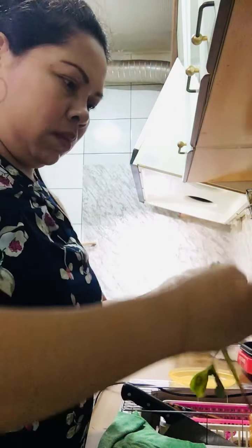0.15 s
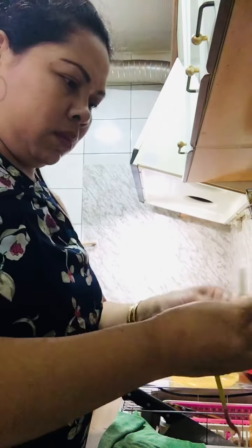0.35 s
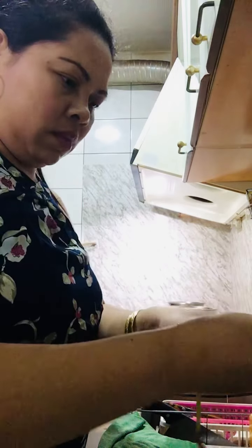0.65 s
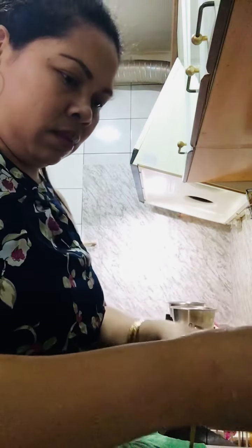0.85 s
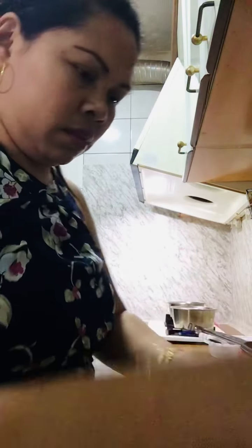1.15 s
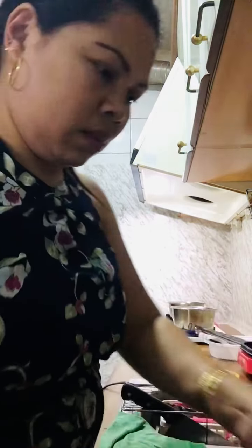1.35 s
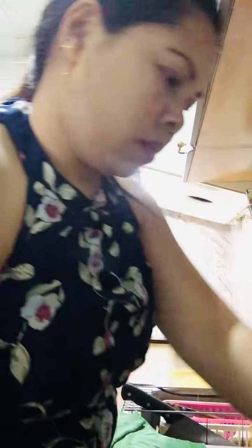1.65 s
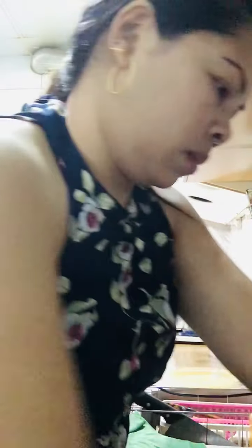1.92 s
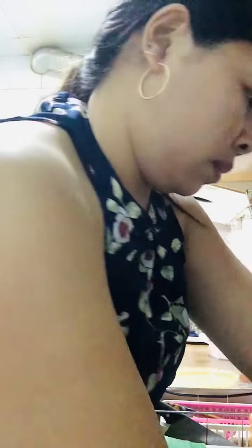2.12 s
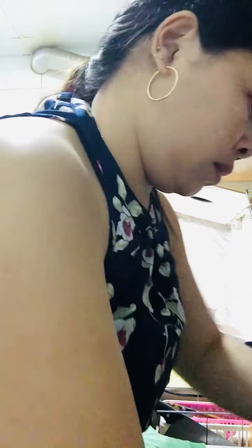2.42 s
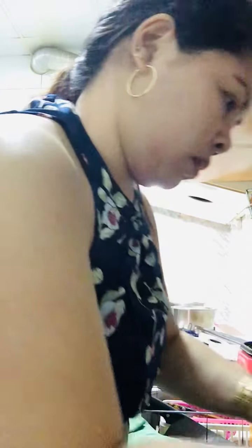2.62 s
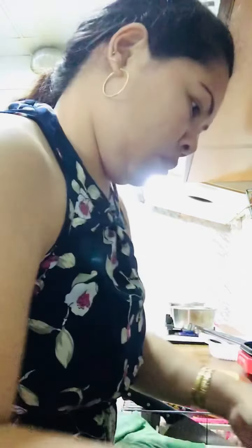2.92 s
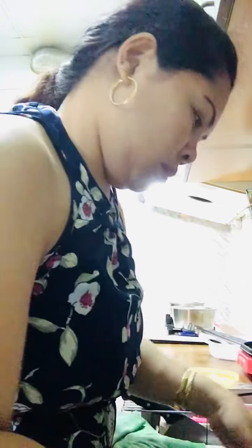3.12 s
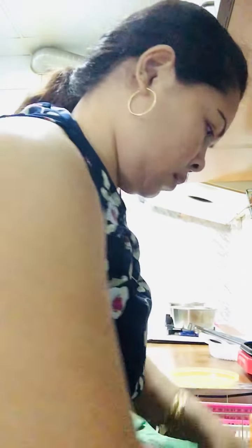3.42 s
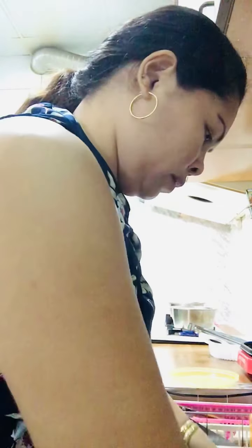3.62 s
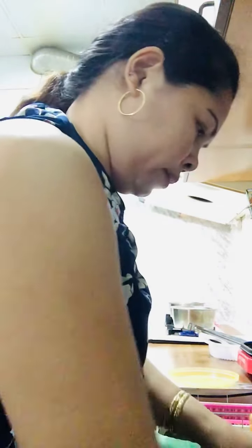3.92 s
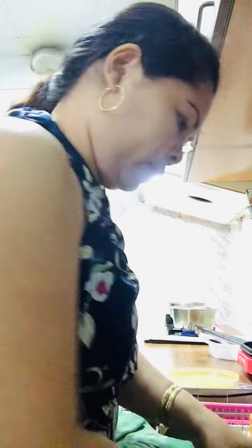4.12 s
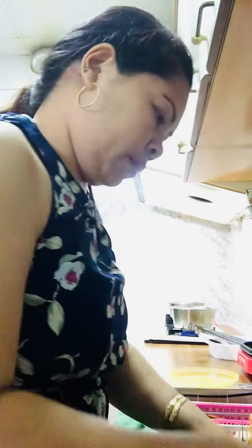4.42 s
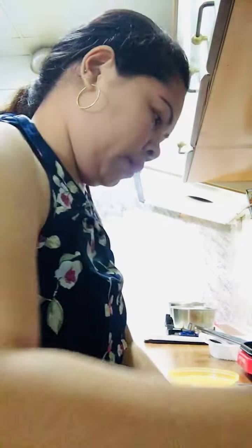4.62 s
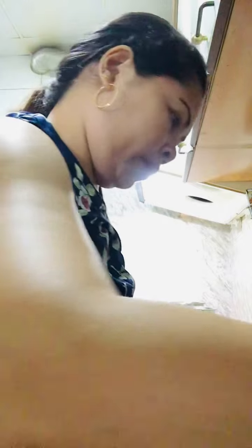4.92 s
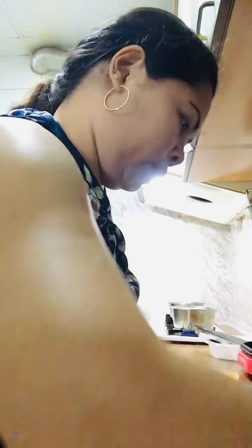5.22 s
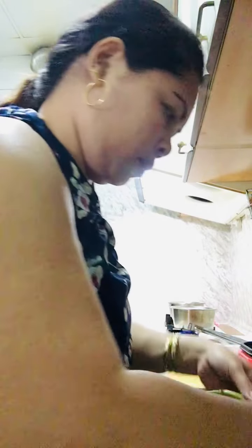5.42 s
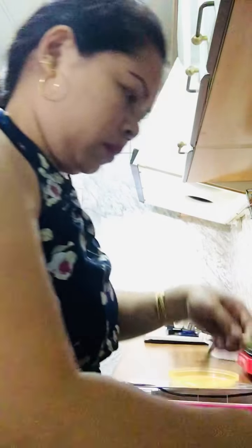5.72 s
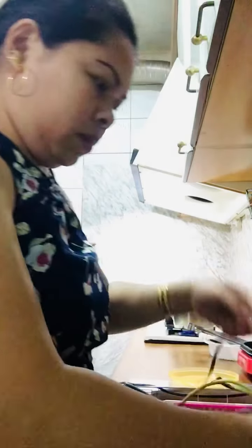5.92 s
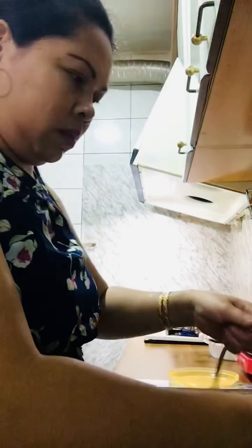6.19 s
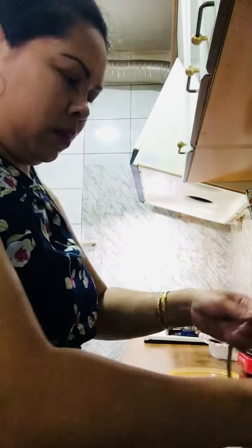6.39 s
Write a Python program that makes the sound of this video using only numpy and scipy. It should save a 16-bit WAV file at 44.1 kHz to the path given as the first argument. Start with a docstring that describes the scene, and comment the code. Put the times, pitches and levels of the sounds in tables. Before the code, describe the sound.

Leafy vegetable stems rustle and snap by hand in a small kitchen, with soft worktop thuds over a low appliance hum.

```python
"""An appliance hums under room noise and hiss in a small tiled kitchen, and leaves begin to rustle.
Leafy stems are handled and snapped over a worktop: each snap is a burst of tearing fibres with a knock
through the worktop. A stem squeaks through the fingers, soft bumps thud and a plastic tub is knocked.
The whole background drops abruptly part way through; the hum grows again near the end."""
import sys
import numpy as np
from scipy import signal
from scipy.fft import rfft, irfft, next_fast_len
from scipy.io import wavfile

SR = 44100
rng = np.random.default_rng(int(sys.argv[2]) if len(sys.argv) > 2 else 0)


def unload_audio(sound):
    """Save the sound as a 16-bit wav file, at the path given as the first command line argument."""
    columns = np.transpose(np.atleast_2d(sound))
    # keep every value between -1 and 1, then stretch to whole-number steps
    steps = np.round(np.clip(columns, -1, 1) * 32767)
    wavfile.write(sys.argv[1], SR, steps.astype(np.int16))


N = 288855


def from_db(db):
    """Decibels to gain."""
    return 10 ** (np.asarray(db) / 20)


def rms_one(x):
    """Scale to rms 1."""
    return x / np.sqrt(np.mean(x ** 2) + 1e-20)


def ramp(start_s, takes_s):
    """0 before the start, rising straight to 1."""
    return np.clip((np.arange(N) / SR - start_s) / takes_s, 0, 1)


def drift(rate_hz):
    """A slow random wander of rms 1."""
    step, settle = 40, 2000
    pole = np.exp(-2 * np.pi * rate_hz * step / SR)
    noise = rng.standard_normal(N // step + settle + 2)
    slow = signal.lfilter([1], [1, -2 * pole, pole * pole], noise)[settle:]
    return np.interp(np.arange(N) / step, np.arange(len(slow)), rms_one(slow))


def coloured(x, spectrum):
    """Shape a signal with an EQ curve; rms 1."""
    hz, level_db = np.transpose(spectrum)
    size = next_fast_len(N)
    grid_hz = np.maximum(np.arange(size // 2 + 1) * SR / size, 1)
    gain = from_db(np.interp(np.log(grid_hz), np.log(hz), level_db, left=-90, right=-90))
    return rms_one(irfft(rfft(x, size) * gain, size)[:N])


def resonance(x, hz, width_hz):
    """Two-pole peak of gain 1."""
    r = np.exp(-np.pi * width_hz / SR)
    feedback = [1, -2 * r * np.cos(2 * np.pi * hz / SR), r * r]
    return signal.lfilter([(1 - r * r) / 2, 0, (r * r - 1) / 2], feedback, x)


def band(x, low_hz, high_hz):
    """Butterworth band-pass; rms 1."""
    return rms_one(signal.sosfilt(signal.butter(2, [low_hz, high_hz], "band", fs=SR, output="sos"), x))


def grains(count, per_s, spread_db):
    """Clicks at random moments with a long-tailed spread of sizes."""
    sizes = from_db(spread_db * np.minimum(rng.exponential(1, count), 5)) * rng.choice([-1, 1], count)
    return sizes * (rng.random(count) < per_s / SR) + 1e-9


# The appliance's wavering hum and the thin whines in its whirr: pitch_hz, width_hz, relative_db
HUM_TONES = [(60.57, 5, -4.5), (115.5, 9.5, -6), (83.5, 8, -11.5)]
WHINE_TONES = [(3870, 60, -16), (4100, 90, -13), (4420, 55, -11), (4830, 55, -13), (7290, 120, -15)]
# EQ curves of the room noise, the whirr and the hiss: frequency_hz, relative_db
ROOM_EQ = [(18, -44), (30, -17), (54, 1.5), (117, -4), (172, -9.5), (271, -4.5), (343, -7), (374, -7),
           (528, -15.5), (1550, -23.5), (2970, -42.5), (4470, -38), (5200, -65), (6760, -80), (11400, -120)]
WHIRR_EQ = [(1500, -7), (2500, 0.5), (2800, -3.5), (3300, -7), (4300, -4), (4900, -14.5), (5250, -10),
            (6400, -8), (7200, -12), (7800, -30), (9500, -19), (12000, -32)]
HISS_EQ = [(4410, -46), (7500, -3.5), (7840, -6), (10500, -7.5), (13600, -8.5), (15200, -10), (16000, -9)]
def background():
    """A bed of appliance hum and whirr, room noise and hiss; all four drop together."""
    drop = ramp(start_s=2.75, takes_s=0.027)
    hum_db = -53.5 - 7 * drop + 4.5 * ramp(start_s=5.43, takes_s=0.16)
    room_db = -51 - 5.5 * drop
    whirr_db = -71 - 4 * drop
    hiss_db = -75.5 - 12 * drop
    tone_noise, room_noise, whirr_noise, hiss_noise = rng.standard_normal((4, N))
    hum = sum(from_db(db) * rms_one(resonance(resonance(tone_noise, hz, width), hz, width))
              for hz, width, db in HUM_TONES)
    whines = sum(from_db(db) * rms_one(resonance(tone_noise, hz, width))
                 for hz, width, db in WHINE_TONES)
    room = from_db(room_db + 1.2 * drift(8)) * coloured(room_noise, ROOM_EQ)
    whirr = from_db(whirr_db + 0.37 * drift(6.4)) * (coloured(whirr_noise, WHIRR_EQ) + whines)
    hiss = from_db(hiss_db) * coloured(hiss_noise, HISS_EQ)
    return from_db(hum_db) * rms_one(hum) + room + whirr + hiss


def kitchen_reverb(x, t60_s=0.33, wall_cut_hz=4200):
    """Reflections off the tiles: ten feedback delays, duller on every round."""
    size = next_fast_len(N + SR)
    hz = np.arange(size // 2 + 1) * SR / size
    wall_lowpass = 1 / (1 + 1j * hz / wall_cut_hz)
    tail = 0
    for k, lag_s in enumerate(rng.uniform(.006, .03, 10)):
        delay = np.exp(-2j * np.pi * hz * lag_s)
        loop = from_db(-60 * lag_s / t60_s) * wall_lowpass ** (lag_s / 0.051) * delay
        tail = tail + (-1) ** k * loop / (1 - loop)
    return irfft(rfft(x, size) * tail, size)[:N]


# Soft low thuds through the worktop: start_s, level_db, pitch_hz
WORKTOP_BUMPS = [(0.938, -33.5, 91.5), (0.977, -39, 99.5), (1.037, -45, 87.5), (1.1, -38, 145),
                 (1.19, -34, 99.6), (1.37, -34, 59.2), (1.928, -37, 87.5), (1.965, -18.5, 85),
                 (2.158, -33, 111), (2.327, -40, 82), (4.378, -44.5, 63.6), (5.019, -35, 78.1),
                 (5.148, -32, 72), (5.978, -39, 61.9)]
def worktop_bumps(attack_s=0.0062, t60_s=0.083):
    """A soft push sets one low mode of the worktop going."""
    out, t = np.zeros(N + SR), np.arange(SR // 2) / SR
    for start_s, level_db, hz in WORKTOP_BUMPS:
        envelope = from_db(level_db - 60 * t / t60_s) * np.minimum(t / attack_s, 1)
        out[round(start_s * SR):][:len(t)] += envelope * np.sin(2 * np.pi * hz * t)
    return out[:N]


# The ring of a hollow plastic tub: pitch_hz, relative_db, t60_s
TUB_MODES = [(280, -2, 0.17), (368, -5.5, 0.21), (457, 12, 0.043), (676, -6, 0.078), (786, 1.5, 0.083),
             (1204, -20, 0.11), (1375, -20, .12), (1540, -21, 0.26)]
# Knocks on the tub: start_s, level_db, contact_s
TUB_HITS = [(4.342, -41, 0.0081), (4.358, -49, 0.0092)]
def tub_knocks():
    """A soft contact sets every mode of the tub ringing."""
    out, t = np.zeros(N + SR), np.arange(SR // 2) / SR
    for start_s, level_db, contact_s in TUB_HITS:
        attack = np.minimum(t / contact_s, 1)
        for hz, mode_db, t60_s in TUB_MODES:
            fade = from_db(level_db + mode_db + rng.normal(0, 1) - 60 * t / t60_s)
            tone = np.sin(2 * np.pi * (hz * t + rng.random()))
            out[round(start_s * SR):][:len(t)] += attack * fade * tone
    return out[:N]


# Grips on a slipping stem: start_s, end_s, first_pitch_hz, last_pitch_hz, level_db
STEM_GRIPS = [(.715, 0.772, 3900, 3200, -64.5), (.79, 0.85, 4080, 4230, -61.5),
              (0.84, 0.884, 4710, 4420, -61.5)]
def stem_squeak(edge_s=0.011, flutter_hz=140):
    """A stem slides through the fingers: a rough whistle that glides in a grip and jumps to the next."""
    t, out = np.arange(N) / SR, 0
    pole = np.exp(-2 * np.pi * flutter_hz / SR)
    flutter = rms_one(signal.lfilter([1], [1, -pole], rng.standard_normal((2, N))))
    for start_s, end_s, first_hz, last_hz, level_db in STEM_GRIPS:
        phase = 2 * np.pi * np.cumsum(np.interp(t, [start_s, end_s], [first_hz, last_hz])) / SR
        grip = ramp(start_s - edge_s, edge_s) - ramp(end_s, edge_s)
        whistle = flutter[0] * np.sin(phase) + flutter[1] * np.cos(phase)
        out = out + from_db(level_db) * grip * whistle
    return out


# Strokes of leaf on leaf: peak_s, rise_s, hold_s, fall_s, level_db, bright_offset_db
LEAF_STROKES = [(.156, .06, .0, .04, -77, 1), (.33, .02, .02, .08, -71, 0), (.6, 0.5, 0.11, 0.14, -69, -12),
                (0.833, 0.1, 0.031, .05, -67.5, 0.5), (1.42, .01, .0, .015, -70, 1),
                (1.543, 0.45, 0.065, 0.22, -68.5, -3), (1.722, .015, 0.015, .015, -65.5, -21),
                (1.808, .1, 0.34, 0.06, -73, 0.5), (1.977, .05, 0.059, .05, -71, 3),
                (2.08, .03, 0.078, 0.055, -65.5, -7.5), (3.1, 0.017, 0.02, .1, -60.5, -19),
                (3.238, 0.026, .0, 0.04, -61.5, -13), (3.492, 0.033, .0, 0.06, -71.5, -9),
                (3.618, 0.028, .0, .14, -67.5, -14), (3.798, .1, .0, 0.042, -69.5, -19),
                (4.512, 0.045, 0.008, .05, -71, -10), (4.564, 0.017, 0.035, 0.022, -78, -22),
                (5.155, .08, 1.8, .1, -77.5, -5), (5.11, 0.062, 0.071, .02, -64, -17),
                (5.214, .008, .0, .02, -70, 2), (5.275, .01, .0, .08, -67.5, -6),
                (5.47, 0.17, 0.12, 0.069, -58, -8), (5.646, .015, .0, 0.097, -58.5, -11),
                (5.786, 0.021, .0, .08, -65, -13), (5.928, 0.13, .0, 0.067, -65.5, -11),
                (6.048, 0.12, 0.0089, 0.049, -69, -12), (6.123, .06, .04, .04, -68.5, -11),
                (6.18, .012, .0, 0.043, -66, -2), (6.356, 0.17, 0.03, 0.12, -62.5, -10.5)]
def stroke_envelopes(edge_db=17.5):
    """Gains of the rustle and its bright layer; a stroke is edge_db down one rise or fall time away."""
    t, power = np.arange(0, N + 64, 64) / SR, 0
    for peak_s, rise_s, hold_s, fall_s, level_db, bright_db in LEAF_STROKES:
        before = np.maximum(peak_s - t, 0) / rise_s
        after = np.maximum(t - peak_s - hold_s, 0) / fall_s
        stroke_db = level_db - edge_db * np.minimum(before + after, 8)
        power = power + from_db([stroke_db, stroke_db + bright_db]) ** 2
    return [np.interp(np.arange(N) / SR, t, np.sqrt(layer)) for layer in power]


# EQ curves of the rustle's body and its bright layer: frequency_hz, relative_db
LEAF_BODY_EQ = [(600, -10), (1000, -24), (1800, -5), (2600, -3.5), (3600, -7), (5000, -8.5), (7000, -12),
                (9500, -32), (13000, -46)]
LEAF_BRIGHT_EQ = [(6000, -22.5), (8500, 3.5), (10500, 2), (13500, -3), (16000, -3.5)]
def leaf_rustle():
    """Dense tiny slips of leaf on leaf; small resonant patches of leaf come and go."""
    body_gain, bright_gain = stroke_envelopes()
    slips = grains(N, per_s=7200, spread_db=2.0)
    patches = sum(from_db(1.2 * drift(22)) * (-1) ** k * resonance(slips, hz, .25 * hz)
                  for k, hz in enumerate(np.geomspace(1000, 8000, num=12)))
    body = coloured(patches, LEAF_BODY_EQ)
    bright = coloured(grains(N, per_s=11000, spread_db=3.5), LEAF_BRIGHT_EQ)
    crackles = .6 * band(grains(N, per_s=300, spread_db=3.5), 3000, 14000)
    clumps = from_db(1.3 * drift(25))
    shimmer = from_db(drift(4.9))
    return clumps * (body_gain * body + bright_gain * shimmer * (bright + crackles))


# The worktop's ring under a snap: pitch_hz, relative_db, ring_s
WORKTOP_MODES = [(398, -1, 0.29), (710, -2, 0.14), (900, 35, 0.16), (922, -47, 0.29), (1083, -31, 0.14),
                 (1230, -17, 0.14), (1380, -10, 0.28), (1663, -21, 0.78), (1820, 35, 0.064),
                 (1850, 0, 0.64), (2541, -20, 0.11), (2480, -23, 0.022)]
# Bands of a snap, and each layer's send to them:
# low_hz, high_hz, delay_s, decay_ratio, knock_db, crack_db, rip_db, fizz_db
SNAP_BANDS = [(105, 208, .004, 0.97, -8, -10.5, -32, -40), (267, 830, 0.0024, 1.6, 0.5, -22, -40, -42),
              (984, 1475, 0.0021, 1.37, -16.5, 1.5, -29, -40),
              (2100, 3120, .00072, 1.28, -46, -0.5, -5.5, -37),
              (3030, 4040, 0.0014, 0.79, -42.5, -7, 0.5, -27),
              (5600, 7180, 0.0013, 0.74, -50, -51, -1.5, -1),
              (10300, 13800, 0.0017, 0.79, -60, -50, -30, 2)]
# Snaps, knocks and clicks: start_s, rise_s, base_t60_s, knock_db, crack_db, rip_db, fizz_db, body_hz
STEM_SNAPS = [(.306, .004, .24, -80, -80, -74, -65, 300), (1.325, 0.012, .08, -55, -56, -55.5, -64, 812),
              (1.343, 0.0017, 0.047, -44.5, -47.5, -60, -72, 812),
              (1.352, 0.0011, 0.056, -38, -68, -60, -80, 457),
              (1.443, 0.0065, 0.081, -52.5, -70, -78, -81, 341),
              (1.882, 0.0007, 0.15, -60, -53, -58, -64, 340),
              (1.913, 0.0038, 0.11, -39.5, -50.5, -53, -61, 537),
              (1.9633, 0.0015, 0.048, -21, -22, -32, -46, 484),
              (1.971, .0013, 0.045, -26, -22.5, -33.5, -60, 697),
              (1.982, .0009, .1, -34.5, -44, -54, -73, 396),
              (2.161, 0.00057, 0.069, -37, -66, -78, -80, 676),
              (3.028, 0.00092, 0.19, -54, -54.5, -56, -80, 672),
              (3.0395, 0.00048, .15, -47, -59, -45, -54, 786),
              (3.047, 0.007, 0.11, -48, -44, -45.5, -70, 247),
              (3.196, 0.0036, 0.086, -70, -78, -65, -81, 298),
              (3.23, 0.0046, .085, -66, -70, -61, -82, 246), (3.486, 0.0066, 0.07, -60, -79, -76, -76, 269),
              (3.697, 0.0053, 0.24, -56, -83, -77, -89, 357),
              (3.908, 0.0014, 0.072, -42, -65, -73, -92, 484),
              (3.925, 0.0023, 0.1, -51.5, -62.5, -78, -92, 691),
              (3.995, 0.0043, 0.095, -52, -60, -70, -90, 404),
              (4.342, .0018, 0.09, -52.5, -66, -73, -92, 285),
              (4.967, 0.0012, 0.25, -56, -60.5, -80, -94, 557.5),
              (4.991, 0.0014, 0.11, -67, -57, -68, -86, 590),
              (5.020, 0.0015, 0.11, -47.5, -77, -85, -84, 512),
              (5.043, 0.00055, 0.087, -46.5, -50.5, -62, -74, 680),
              (5.100, .003, 0.23, -44.5, -57, -69, -78, 930),
              (5.121, 0.00017, 0.052, -36, -29.5, -38.5, -70, 535),
              (5.132, .0019, 0.13, -34, -36, -59, -80, 790),
              (5.149, 0.0017, 0.041, -31.5, -42, -57, -85, 630),
              (5.19, .0037, 0.23, -59, -57, -65, -80, 414), (5.369, 0.0017, 0.023, -65, -65, -57, -80, 276),
              (5.406, .001, 0.04, -54, -64, -59, -73, 342), (5.647, .0011, 0.12, -58.5, -71, -62, -66, 496),
              (5.785, .0012, 0.065, -66, -72, -61, -85, 325),
              (6.354, 0.0019, 0.073, -74, -77, -58.5, -75, 297),
              (6.431, .003, .065, -70, -76, -61, -76, 300)]
def stem_snaps():
    """Fibres part in a shower of clicks: dull knock, crack, bright rip and fizz; treble dies first."""
    out, t = np.zeros(N + SR), np.arange(SR // 2) / SR
    for start_s, rise_s, base_t60_s, *layers_db, body_hz in STEM_SNAPS:
        fibres = rms_one(grains(len(t), per_s=7000, spread_db=1.0))
        touch_db = rng.normal(0, 2, len(WORKTOP_MODES))   # each touch favours other modes
        worktop = sum(from_db(db + offset_db) * rms_one(resonance(fibres, hz, 3.0 / ring_s))
                      for (hz, db, ring_s), offset_db in zip(WORKTOP_MODES, touch_db))
        struck_body = np.sin(2 * np.pi * body_hz * t)
        shower = fibres + 0.058 * rms_one(worktop) + 0.2 * struck_body
        for low_hz, high_hz, delay_s, decay_ratio, *sends_db in SNAP_BANDS:
            part = band(shower, low_hz, high_hz)
            loudest = part[round((delay_s + rise_s) * SR):][:SR // 60]   # just after the attack
            gain = np.linalg.norm(from_db(np.add(layers_db, sends_db))) / np.std(loudest)
            attack = np.sin(np.pi / 2 * np.clip((t - delay_s) / max(rise_s, .0002), 0, 1)) ** 2
            fade = from_db(-60 * np.maximum(t - delay_s - rise_s, 0) / (base_t60_s * decay_ratio))
            out[round(start_s * SR):][:len(t)] += gain * attack * fade * part
    return out[:N]


def scene():
    """Hands at work with a touch of kitchen reverb, over dry bumps and the background; mono."""
    hands = stem_snaps() + leaf_rustle() + stem_squeak() + tub_knocks()
    reverb = from_db(-18.5) * kitchen_reverb(hands)
    return (hands + reverb + worktop_bumps() + background())[None]


def record(dry, low_cut_hz=38, high_cut_hz=16100):
    """The microphone loses the deep bass and dips in the treble; the top is cut."""
    thinned = signal.sosfilt(signal.butter(3, low_cut_hz, "high", fs=SR, output="sos"), dry)
    dipped = thinned - 0.47 * resonance(thinned, hz=10370, width_hz=1350)
    return signal.sosfilt(signal.cheby2(20, 60, high_cut_hz, fs=SR, output="sos"), dipped)


dry = scene()
out = record(dry)
unload_audio(out)
```